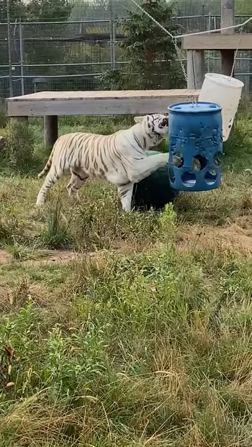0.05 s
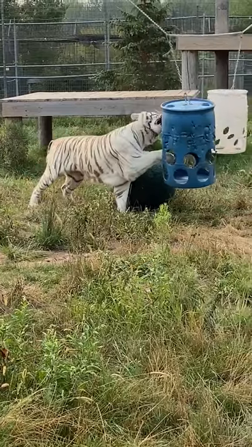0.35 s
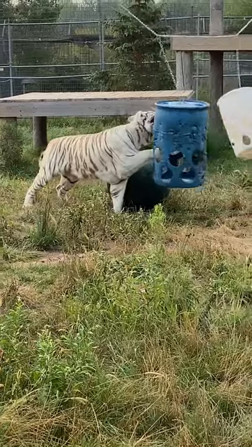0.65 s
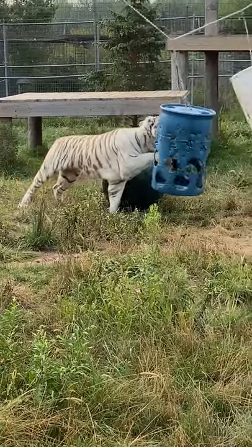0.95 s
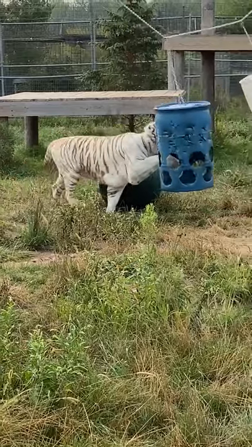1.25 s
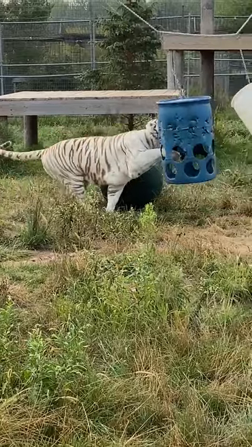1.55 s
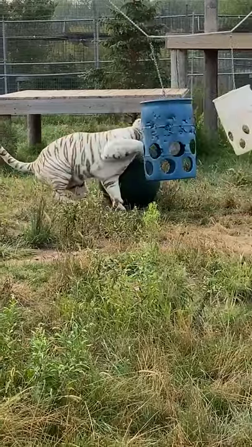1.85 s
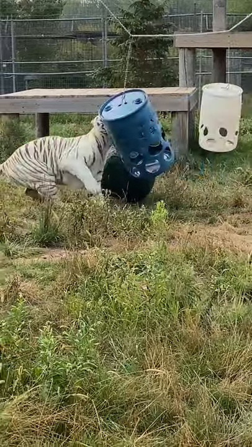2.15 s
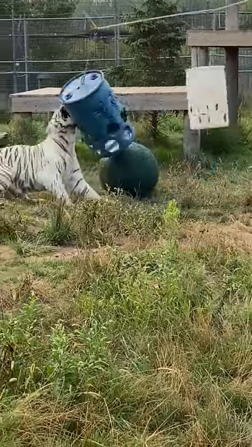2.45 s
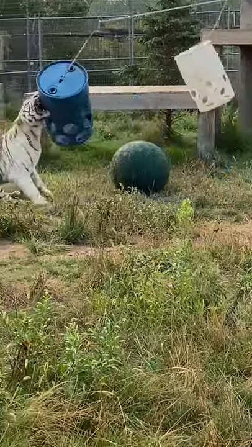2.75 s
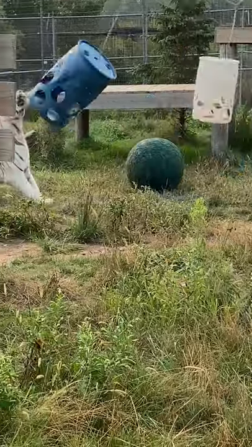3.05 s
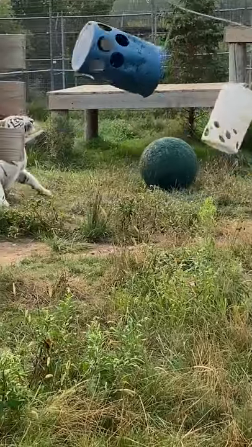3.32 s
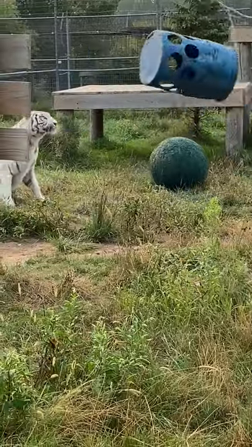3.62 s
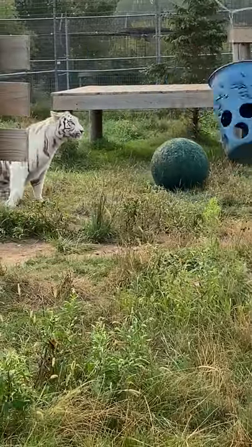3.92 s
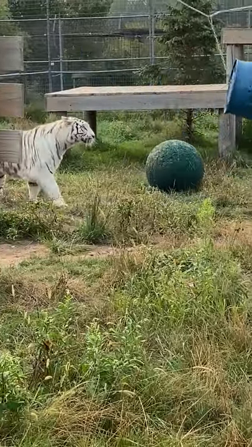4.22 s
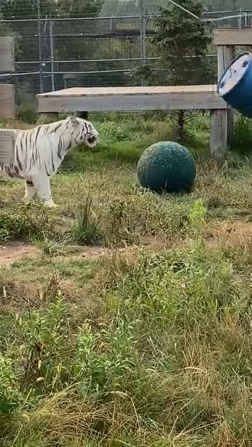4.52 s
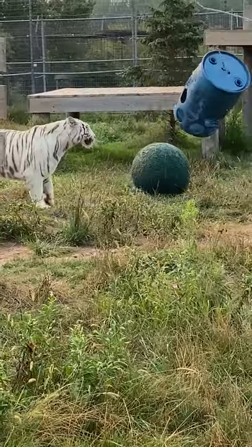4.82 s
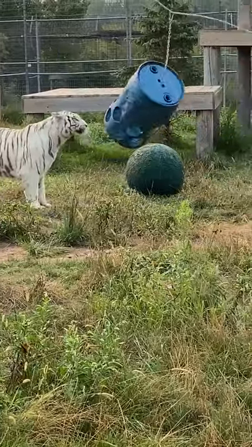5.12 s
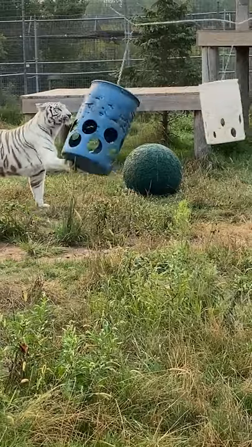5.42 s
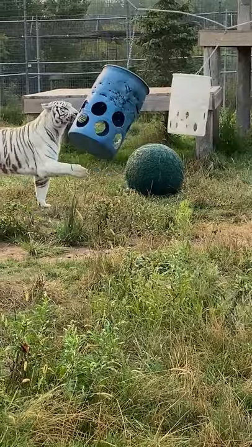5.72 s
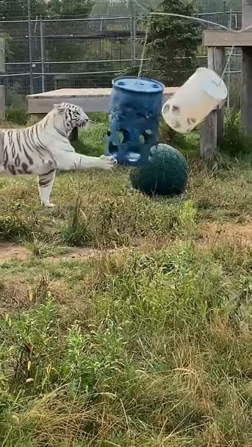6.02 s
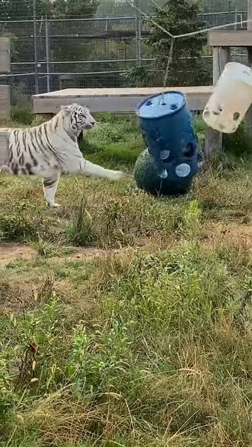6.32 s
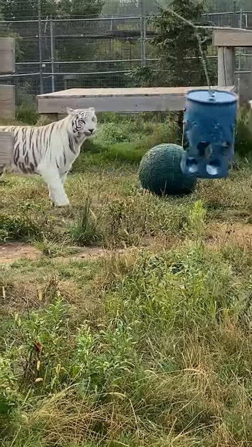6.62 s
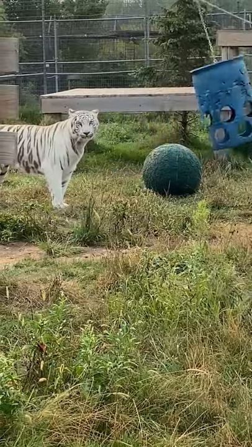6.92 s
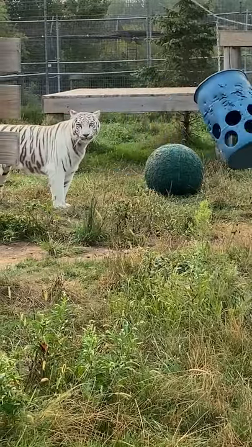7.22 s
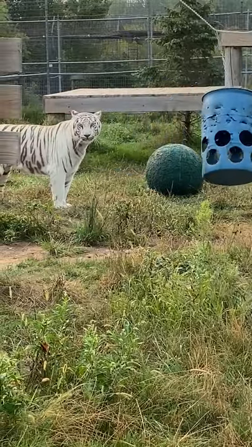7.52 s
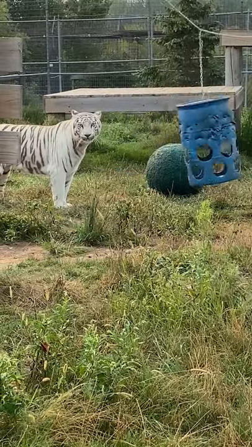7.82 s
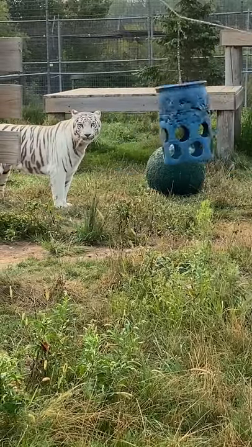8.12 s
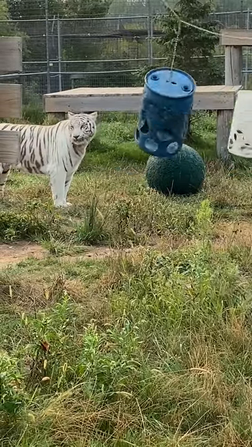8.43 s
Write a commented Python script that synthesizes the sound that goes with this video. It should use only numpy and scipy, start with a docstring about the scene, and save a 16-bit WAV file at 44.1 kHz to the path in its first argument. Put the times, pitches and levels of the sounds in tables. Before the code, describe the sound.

Hollow plastic barrels knock, boom and rattle on their chains as a tiger bats them around outdoors.

```python
"""A tiger bats a hanging plastic barrel in a grassy enclosure; a second barrel jerks on the same line.
Blows clack the plastic walls and boom the hollow drums. The chains snap taut, then rattle and
scrape by stick-slip as the load swings; a paw drags and squeaks over the wall.
Far off an engine runs unevenly, birds call and an insect ticks."""
import sys
import numpy as np
from scipy import signal
from scipy.fft import rfft, irfft
from scipy.io import wavfile
from scipy.ndimage import uniform_filter1d

SR = 44100
rng = np.random.default_rng(int(sys.argv[2]) if len(sys.argv) > 2 else 0)


def unload_audio(sound):
    """Save the sound as a 16-bit wav file, at the path given as the first command line argument."""
    columns = np.transpose(np.atleast_2d(sound))
    # keep every value between -1 and 1, then stretch to whole-number steps
    steps = np.round(np.clip(columns, -1, 1) * 32767)
    wavfile.write(sys.argv[1], SR, steps.astype(np.int16))


N = 381906

# Table levels are relative; each source applies its own gain.
# hard blows on a wall: start_s, level_db, resonance_hz, chatter_t60_s
KNOCKS = [(0.162, -22.5, 780, 0.2), (0.329, -36.5, 850, 0.065), (0.861, -37.5, 1190, 0.13),
          (1.018, -20.5, 870, 0.065), (1.585, -35, 846, 0.13), (1.667, -27.5, 740, 0.17),
          (2.131, -22, 314, 0.051), (2.271, -27.5, 334, 0.062), (2.746, -23, 690, 0.16),
          (2.889, -8, 650, 0.03), (2.899, -4, 660, 0.048), (2.939, -22.5, 1420, 0.06),
          (3.159, -19.5, 1110, 0.034), (3.268, -11, 532, 0.09), (3.435, -35, 1500, 0.039),
          (3.603, -20.5, 1360, 0.13), (3.626, -16, 1720, 0.04), (3.629, -16, 690, 0.11),
          (3.813, -26, 1150, 0.1), (3.898, -16.5, 650, 0.095), (4.121, -30.5, 1580, 0.064),
          (4.295, -24.5, 560, 0.17), (4.9, -23, 666, 0.061), (5.046, -27, 830, 0.039),
          (5.32, -19.5, 810, 0.065), (5.329, -22, 1530, 0.043), (5.337, -20.5, 576, 0.045),
          (5.486, -22, 670, 0.097), (5.827, -34, 755, 0.31), (6.369, -35.5, 2000, 0.072),
          (6.463, -31.5, 730, 0.063), (6.792, -42, 1330, 0.15), (7.079, -17, 1630, 0.025),
          (7.081, -23, 645, 0.063), (7.378, -39, 1750, 0.06), (7.454, -31.5, 706, 0.092),
          (7.861, -34, 980, 0.068)]
# heavy pushes on a drum: start_s, level_db, pitch_hz, t60_s
THUDS = [(0.171, -28.5, 179, 0.24), (0.903, -34.5, 184, 0.27), (1.096, -20, 180, 0.13),
         (1.13, -23, 180, 0.16), (2.14, -20, 102.4, 0.31), (2.6, -25.5, 178, 0.086),
         (2.752, -23.5, 225, 0.21), (2.913, -13, 106, 0.13), (2.917, -11.5, 178.5, 0.42),
         (3.289, -22, 223, 0.11), (3.641, -27.5, 113, 0.33), (3.739, -26, 98, 0.18),
         (3.804, -20.5, 166, 0.11), (3.902, -22, 156.6, 0.19), (4.309, -27, 173.3, 0.42),
         (4.559, -30, 221, 0.36), (4.72, -32.5, 207, 0.31), (5.053, -22.5, 166.4, 0.28),
         (5.331, -16.5, 160.8, 0.31), (5.491, -27.5, 165, 0.21), (6.11, -33.5, 174.7, 0.48),
         (6.468, -25.5, 180, 0.07), (7.085, -23, 168, 0.14), (7.462, -29, 155.6, 0.24),
         (7.691, -27.5, 203, 0.21), (8.09, -39.5, 176, 0.13)]
# links snapping taut: start_s, level_db, t60_s
SNAPS = [(0.156, -24.5, 0.05), (0.861, -43, 0.05), (1.4338, -38.5, 0.042), (1.6664, -30.5, 0.072),
         (2.392, -38, 0.045), (2.44, -39, 0.059), (2.549, -43, 0.46), (2.751, -28.5, 0.14),
         (2.899, -24.5, 0.067), (2.9385, -28.5, 0.058), (3.1444, -29, 0.14), (3.173, -29, 0.24),
         (3.2088, -31.5, 0.25), (3.433, -36.5, 0.042), (3.477, -36.5, 0.044), (3.6, -30.5, 0.19),
         (3.6186, -30.5, 0.31), (3.69, -25.5, 0.12), (3.815, -37, 0.052), (3.845, -35.5, 0.37),
         (3.934, -32, 0.1), (3.984, -37, 0.1), (4.068, -40.5, 0.19), (4.119, -37.5, 0.053),
         (4.2929, -17.5, 0.041), (4.557, -25.5, 0.075), (4.628, -31.5, 0.17), (4.833, -39, 0.28),
         (5.061, -30.5, 0.11), (5.125, -39.5, 0.12), (5.2786, -35, 0.22), (5.479, -36.5, 0.065),
         (5.825, -28, 0.031), (6.135, -35.5, 0.14), (6.369, -37.5, 0.023), (6.511, -42, 0.056),
         (6.888, -49, 0.057), (7.076, -29, 0.14), (7.448, -44, 0.051)]
# whole-drum modes: pitch_hz, level_db, base_t60_s
DRUM_MODES = [(74.4, 3.5, 0.11), (104, -14.5, 0.38), (118, -4, 0.25), (160.5, 4.5, 0.19), (184, 3, 0.26),
              (227.4, -6, 0.24), (263, -12.5, 0.45)]
# spectrum of sliding links: freq_hz, gain_db
RATTLE_SPECTRUM = [(200, -102), (1000, -11.5), (2200, 2.5), (3600, 6.5), (4900, 1.5), (5600, 2),
                   (6400, 5.5), (7400, 3), (11000, -1.5), (13000, 0.5), (16000, 0.5)]


def amp(db):
    """Decibels to gain."""
    return 10 ** (np.asarray(db) / 20)


def unit_rms(x):
    """Scale to rms 1."""
    return x / np.sqrt(np.mean(x ** 2) + 1e-20)


def unit_peak(x):
    """Scale the loudest 6 ms to rms 1."""
    return x / np.sqrt(uniform_filter1d(x ** 2, 256).max() + 1e-20)


def log_interp(points, hz):
    """Interpolate over log frequency."""
    points_hz, values = np.transpose(points)
    return np.interp(np.log(hz + 1), np.log(points_hz + 1), values)


def curves(rows):
    """Interpolate timed rows to one value per sample and column."""
    times_s, *columns = np.transpose(rows)
    return [np.interp(np.arange(N) / SR, times_s, column) for column in columns]


def add(mix, start_s, sound):
    """Mix a sound in at start_s."""
    part = mix[max(round(start_s * SR), 0):][:len(sound)]
    part += sound[:len(part)]


def drift(rate_hz):
    """Smooth random curve, rms 1."""
    return unit_rms(signal.resample(rng.standard_normal(max(int(2 * rate_hz * N / SR), 4)), N))


def colour(x, spectrum, size=4096):
    """Minimum-phase filter through (freq_hz, gain_db) points."""
    log_gain = np.log(amp(log_interp(spectrum, abs(np.fft.fftfreq(size, 1 / SR)))))
    taps = np.fft.ifft(np.exp(np.conj(signal.hilbert(log_gain)))).real
    return signal.fftconvolve(x, taps[:size // 2])[:len(x)]


def grains(size, per_s, spread_db):
    """Tiny random contacts, a few much harder than the rest."""
    hardness = amp(spread_db * np.minimum(rng.exponential(1, size), 4))
    return unit_rms(rng.standard_normal(size) * hardness * (rng.random(size) < per_s / SR))


def burst(t60_s, rise_s, per_s, spread_db):
    """Flurry of contacts: sharp rise, exponential decay."""
    t = np.arange(SR // 2) / SR
    envelope = (1 - np.exp(-t / rise_s)) * np.exp(-np.log(1000) * t / max(t60_s, .01))
    return grains(len(t), per_s, spread_db) * envelope


def slips(per_s, depth_db, settle_s=0.003):
    """Stick-slip envelope: a steady rub plus brief jerks where the grip lets go."""
    jerks = np.minimum(rng.exponential(1, N), 2) ** 2 * (rng.random(N) < per_s / SR)
    power = signal.lfilter([1], [1, -np.exp(-1 / (settle_s * SR))], jerks)
    return unit_rms(np.sqrt(1 + amp(depth_db) ** 2 * power / power.mean()))


def swells(rows):
    """Contact pressure: one smooth rise and fall per row."""
    pressure = np.zeros(N)
    for centre_s, level_db, length_s in rows:
        add(pressure, centre_s - length_s / 2, amp(level_db) * np.hanning(max(int(length_s * SR), 8)))
    return pressure


def ring(modes, damping=1, size=SR // 2):
    """Unit-energy impulse response; adjacent modes swing in opposite directions."""
    t = np.arange(size) / SR
    response = sum((-1) ** k * amp(db - 60 * t * damping / t60_s) * np.sin(2 * np.pi * hz * t)
                   for k, (hz, db, t60_s) in enumerate(modes))
    return response / np.linalg.norm(response)


def air(level_db=-53.5):
    """Soft open air, slowly wavering."""
    # freq_hz, gain_db
    spectrum = [(25, -22), (60, 10.5), (110, -18.5), (200, 1), (320, -20.5), (600, -15), (1200, -25),
                (3300, -27), (6500, -38.5), (10000, -52), (16000, -88)]
    return amp(level_db + 2 * drift(2.8)) * unit_rms(colour(rng.standard_normal(N), spectrum))


def insect(level_db=-70, pitch_hz=6500, ticks_per_s=10):
    """Narrow-band buzz in uneven pulses."""
    band = [(pitch_hz - 900, -50), (pitch_hz - 200, 0), (pitch_hz + 200, 0), (pitch_hz + 900, -50)]
    buzz = colour(rng.standard_normal(N), band)
    ticks = np.sin(np.pi * np.cumsum(ticks_per_s + drift(2)) / SR) ** 4
    return amp(level_db) * unit_rms(buzz * ticks)


def engine(waver_db=3):
    """Distant engine: only the lowest firing orders carry this far."""
    # time_s, firing_hz, level_db
    running = [(0.25, 26, -52), (.4, 28.8, -44), (.55, 31.2, -45), (.95, 25, -45.5), (1.2, 30.3, -46.5),
               (2.1, 33, -47), (3, 31.5, -52), (5.4, 32.2, -53), (6.1, 30.7, -46.5), (7.1, 28.9, -48),
               (8, 28.6, -48), (8.6, 24.5, -50.5)]
    # firing_multiple, level_db
    orders = [(1, -35), (2, -12.5), (3, -0.5), (4, -5.5), (5, -12)]
    firing_hz, level_db = curves(running)
    cycles = np.cumsum(firing_hz * (1 + 0.0055 * drift(7))) / SR
    hum = sum(amp(db + waver_db * drift(5.9)) * np.sin(2 * np.pi * (k * cycles + rng.random()))
              for k, db in orders)
    return amp(level_db) * unit_rms(hum)


def far_bird(waver=0.00345, fade_s=0.01):
    """One thin call that climbs, holds and falls away."""
    # time_s, pitch_hz, level_db
    call = [(1.3, 900, -59), (1.34, 947, -76), (1.378, 1000, -58), (1.41, 974, -87), (1.564, 1030, -82),
            (1.59, 1062, -60), (1.85, 1098, -68), (1.925, 1042, -53), (1.95, 1000, -71)]
    # pitch_multiple, level_db
    harmonics = [(1, -3), (2, -6), (3, -0.5)]
    pitch_hz, level_db = curves(call)
    t = np.arange(N) / SR
    fade = np.clip(np.minimum(t - call[0][0], call[-1][0] - t) / fade_s, 0, 1)
    cycles = np.cumsum(pitch_hz * (1 + waver * drift(80))) / SR
    tone = sum(amp(db) * np.sin(2 * np.pi * k * cycles) for k, db in harmonics)
    return fade * amp(level_db) * unit_rms(tone)


def small_bird(gain_db=-3, chip_s=0.047):
    """High chips, each one quick, unsteady glide."""
    # start_s, start_hz, end_hz, level_db
    chips = [(1.925, 4110, 3830, -54), (5.022, 4400, 5300, -41)]
    out, arch = np.zeros(N), np.hanning(int(chip_s * SR))
    for start_s, start_hz, end_hz, level_db in chips:
        pitch_hz = np.linspace(start_hz, end_hz, len(arch)) * (1 + .02 * drift(300)[:len(arch)])
        add(out, start_s, amp(level_db + gain_db) * arch * np.sin(2 * np.pi * np.cumsum(pitch_hz) / SR))
    return out


def enclosure(x, early_db=-9, tail_db=-15, tail_t60_s=0.38, path_sets=4):
    """Ground, platform and fences return echoes and a short tail; paths change as the barrels swing."""
    t, out = np.arange(SR // 2) / SR, x
    for k in range(path_sets):
        early = grains(len(t), per_s=1500, spread_db=0.48) * (t > .004) * np.exp(-t / 0.025)
        tail = colour(rng.standard_normal(len(t)), [(100, 6.5), (1500, -14.5), (5000, -31), (16000, -2)])
        tail = tail * (1 - np.exp(-t / 0.01)) * np.exp(-np.log(1000) * t / tail_t60_s)
        echoes = amp(early_db) * early / np.linalg.norm(early)
        echoes += amp(tail_db) * tail / np.linalg.norm(tail)
        crossfade = np.maximum(np.cos(2 * np.pi * (np.arange(N) / SR + k / path_sets)), 0)
        out = out + signal.fftconvolve(x * crossfade, echoes)[:N]
    return out


def wall(force, ring_db, stretch=1, t60_at_650hz_s=0.11):
    """Plastic wall: a broad dull response plus damped modes, shifted by stretch as it bends."""
    # pitch_hz, level_db
    wall_modes = [(384, 12.5), (445, 7), (530, 2.5), (646, 19), (717, 10), (805, -0.5), (870, 13),
                  (1065, 20.5), (1190, 14.5), (1275, 21.5), (1390, -0.5), (1643, 12), (2111, 9.5)]
    # freq_hz, gain_db
    spectrum = [(60, -50), (200, -11.5), (330, -5.5), (450, 2), (700, 1), (1000, 1.5), (1500, -4.5),
                (2200, -8), (4000, -19), (7000, -23), (16000, -72)]
    modes = [(hz * stretch, db, t60_at_650hz_s * np.sqrt(650 / hz)) for hz, db in wall_modes]
    ringing = signal.fftconvolve(force, ring(modes, size=SR // 5))[:len(force)]
    return unit_rms(colour(force, spectrum)) + amp(ring_db) * unit_rms(ringing)


def turning(x, depth_db=3.2):
    """Links and barrel turn, moving the contact: single resonances flare and fade."""
    frames = signal.stft(x, nperseg=512, noverlap=384)[2]

    def patches(bins, hops):
        across_freq = uniform_filter1d(rng.standard_normal(frames.shape), bins, axis=0)
        return unit_rms(uniform_filter1d(across_freq, hops, axis=1))

    flare = np.clip(patches(5, 12) + .5 * patches(40, 20), -2, 2)
    return signal.istft(frames * unit_rms(amp(depth_db * flare)), nperseg=512, noverlap=384)[1][:N]


def agitation(blows, swing_db, follow, shake_db, settle_db_per_s):
    """Rubbing strength of a part: follows the swing and flares after its own blows."""
    # load swinging on its line: time_s, effort_db
    swing = [(0, -14), (0.7, -22), (1.1, -5), (1.9, -6.5), (2.65, 0.5), (3.25, 11), (3.55, -4), (3.75, 13),
             (4.05, 7.5), (4.2, -6.5), (4.6, 0), (5.45, 3), (5.73, -7.5), (5.9, -0.5), (6.9, -8),
             (7.75, -4), (8.27, -13), (8.65, -2)]
    effort_db, = curves(swing)
    shake_power, t = np.zeros(N), np.arange(SR) / SR
    for start_s, level_db, *_ in blows:
        add(shake_power, start_s, amp(level_db - settle_db_per_s * t) ** 2)
    return np.hypot(amp(swing_db + follow * effort_db), amp(shake_db) * np.sqrt(shake_power))


def rubbing(clump_db=0.77):
    """Stick-slip of the swinging load: shared clumps of grains shake drum, wall and chain."""
    drum_gain = agitation(THUDS, swing_db=-47.5, follow=0.8, shake_db=-20.5, settle_db_per_s=80)
    wall_gain = agitation(KNOCKS, swing_db=-52, follow=0.97, shake_db=-22.5, settle_db_per_s=124)
    chain_gain = agitation(SNAPS, swing_db=-56.5, follow=0.82, shake_db=-33.5, settle_db_per_s=79)
    clumps = amp(clump_db * drift(30))
    jerks = clumps * slips(per_s=96, depth_db=-4)
    fine = grains(N, per_s=5000, spread_db=1)
    crackle = grains(N, per_s=5000, spread_db=1.8)
    shudder = unit_rms(signal.fftconvolve(fine * clumps, ring(DRUM_MODES, damping=1.7))[:N])
    scrape = unit_rms(wall(fine * jerks, ring_db=-18))
    rattle = unit_rms(colour(crackle * jerks, RATTLE_SPECTRUM))
    return drum_gain * shudder + wall_gain * scrape + chain_gain * rattle


def scuffs(gain_db=3, wall_db=-5):
    """Sliding links and dry grass crunch in jerky swells; the barrel sounds along."""
    # centre_s, level_db, length_s
    slides = [(0.42, -56.5, 0.028), (1.85, -55, 0.14), (2.427, -42, 0.11), (2.868, -41.5, 0.29),
              (3.34, -40.5, 0.079), (4.365, -42, 0.17), (4.572, -37.5, 0.11), (4.675, -49.5, 0.083),
              (5.068, -42, 0.075), (5.185, -49, 0.11), (5.495, -41, 0.076), (5.835, -43, 0.084),
              (5.925, -47, 0.18), (6.089, -49, 0.07), (6.18, -52.5, 0.18), (6.542, -51.5, 0.24),
              (6.687, -50, 0.14), (7.012, -51, 0.17), (7.14, -50, 0.059), (7.322, -51.5, 0.2),
              (7.465, -41.5, 0.059), (7.738, -49, 0.11), (7.992, -49.5, 0.11), (8.094, -48, 0.12),
              (8.425, -51, 0.2), (8.506, -49, 0.078)]
    force = swells(slides) * grains(N, per_s=6000, spread_db=1.7) * slips(per_s=80, depth_db=0.5)
    crunch = unit_rms(colour(force, RATTLE_SPECTRUM))
    body = unit_rms(wall(force, ring_db=-17))
    return amp(gain_db) * np.std(force) * (crunch + amp(wall_db) * body)


def chain_snaps(gain_db=-3, softness=0.0088):
    """Links jerk tight in a bright clatter; longer ones start more softly."""
    # freq_hz, gain_db
    link_spectrum = [(200, -17.5), (900, 7.5), (2000, 5), (3600, 4.5), (4900, 0), (5600, -1.5), (6400, 6),
                     (7400, -5), (11000, -2), (13000, -5), (16000, -10.5)]
    out = np.zeros(N)
    for start_s, level_db, t60_s in SNAPS:
        force = burst(t60_s, rise_s=softness * t60_s, per_s=8000, spread_db=2.5)
        add(out, start_s, amp(level_db + gain_db) * unit_peak(colour(force, link_spectrum)))
    return out


def squeaks(waver=0.0133):
    """The rubbed wall catches: one mode sings briefly at an unsteady pitch."""
    # centre_s, level_db, length_s, pitch_hz
    catches = [(0.896, -44, 0.029, 1280), (4.865, -50, 0.08, 1250), (5.185, -51, 0.12, 1293),
               (7.021, -41, 0.065, 436), (7.022, -44, 0.055, 802), (7.03, -39.5, 0.08, 650),
               (7.272, -42.5, 0.028, 654)]
    out = np.zeros(N)
    for centre_s, level_db, length_s, pitch_hz in catches:
        cycles = np.cumsum(pitch_hz * (1 + waver * drift(120))) / SR
        out += swells([(centre_s, level_db, length_s)]) * np.sin(2 * np.pi * cycles)
    return out


def paw_drags():
    """Paw, claws and rope judder over the wall: a dull, hollow rustle."""
    # centre_s, level_db, length_s
    strokes = [(0.87, -51, 0.2), (1.09, -56, 0.083), (2.44, -48, 0.15), (2.887, -29, 0.065),
               (3.06, -56, 0.085), (3.175, -32.5, 0.054), (3.23, -31, 0.07), (3.63, -26, 0.09),
               (3.98, -42.5, 0.13), (4.45, -48, 0.16), (4.67, -47.5, 0.084), (5.09, -40, 0.07),
               (6.57, -53, 0.26), (7.73, -45.5, 0.2), (8.0, -50.5, 0.11)]
    force = swells(strokes) * grains(N, per_s=3000, spread_db=0.67) * slips(per_s=170, depth_db=5)
    return np.std(force) * unit_rms(wall(force, ring_db=0.5))


def boom(pitch_hz, t60_s, drum_db=-7, rise_s=0.0031, flutter_db=-9):
    """A pushed-in panel booms; the drum modes join in, and the buckling wall flutters."""
    t = np.arange(SR // 2) / SR
    panel = unit_peak(ring([(pitch_hz, 0, t60_s)]))
    drum = unit_peak(ring(DRUM_MODES, damping=0.92))
    hollow = unit_peak((panel + amp(drum_db) * drum) * (1 - np.exp(-t / rise_s)))
    buckling = burst(t60_s=0.11, rise_s=0.0092, per_s=3300, spread_db=1)
    spectrum = [(30, -22), (70, -28), (130, 11), (240, 1.5), (340, -14.5), (700, -6), (2000, -75)]
    return unit_peak(hollow + amp(flutter_db) * unit_peak(colour(buckling, spectrum)))


def thuds(gain_db=-5, knock_share_db=-17, knock_lag_s=0.00588):
    """Heavy pushes boom the drum; each wall knock passes it a little force too."""
    out = np.zeros(N)
    for start_s, level_db, pitch_hz, t60_s in THUDS:
        add(out, start_s, amp(level_db + gain_db) * boom(pitch_hz, t60_s))
    for start_s, level_db, *_ in KNOCKS:
        add(out, start_s + knock_lag_s, amp(level_db + knock_share_db) * boom(pitch_hz=190, t60_s=0.13))
    return out


def slam(start_s=2.897, level_db=-7, pitch_hz=190):
    """The hardest blow shoves the whole wall in: one deep pressure pulse."""
    out, t = np.zeros(N), np.arange(SR // 70) / SR
    add(out, start_s, amp(level_db) * np.hanning(len(t)) * np.sin(2 * np.pi * pitch_hz * t))
    return out


def knocks(gain_db=-8, strike_db=17, glance_db_per_s=65, softness=0.011, reach=2.36):
    """Each blow strikes, then chatters on the wall; glancing ones strike less and chatter longer."""
    out = np.zeros(N)
    for start_s, level_db, resonance_hz, t60_s in KNOCKS:
        chatter = burst(t60_s, rise_s=softness * t60_s, per_s=5500, spread_db=2.5)
        strike = amp(strike_db - glance_db_per_s * t60_s) * signal.unit_impulse(len(chatter), SR // 1000)
        padding = signal.butter(2, min(reach * resonance_hz, SR / 3), fs=SR)  # soft contact cuts treble
        force = signal.lfilter(*padding, chatter + strike)
        clack = wall(force, ring_db=-6.5, stretch=1 + .007 * rng.standard_normal())
        resonance = signal.iirpeak(resonance_hz, Q=2.4, fs=SR)  # set by where the blow lands
        spot = signal.lfilter(*resonance, signal.lfilter(*resonance, clack))
        wall_share = min(resonance_hz / 600, 1) ** 3  # low blows barely rattle the rest of the wall
        knock = unit_peak(wall_share * unit_rms(clack) + unit_rms(spot))
        add(out, start_s, amp(level_db + gain_db) * knock)
    return out


def stereo_ports(x):
    """Two close ports hear the same bass; the treble differs in phase and diffuse scatter."""
    # freq_hz, left_lead_rad
    port_phase = [(0, 0), (2050, 0), (2480, .4), (2850, .02), (3850, .02), (4400, .6), (4750, .03),
                  (5400, .03), (5900, 1.5), (6350, 2.2), (6700, 3.12), (7850, 3.14), (7960, 0),
                  (13000, .03), (13700, 1.3), (14300, 3.05), (16000, 3.1)]
    # freq_hz, left_right_likeness
    port_likeness = [(0, 1), (110, 1), (200, .999), (330, .992), (650, .997), (1200, .975), (1900, .997),
                     (2480, .88), (2900, .997), (3750, .997), (4450, .72), (4750, .99), (5300, .99),
                     (5800, .6), (6900, .998), (11500, .995), (12050, .8), (12400, .99), (13000, .98),
                     (13400, .55), (16000, .6)]
    # freq_hz, left_minus_right_db
    port_balance = [(250, 0), (400, -.4), (950, 1.2), (1300, .9), (2000, 0)]
    hz, spectrum = np.fft.rfftfreq(N, 1 / SR), rfft(x)
    likeness = np.clip(log_interp(port_likeness, hz), 0, 1)
    frames = signal.stft(irfft(np.sqrt(1 - likeness) * spectrum, N), nperseg=256)[2]
    scatter = signal.istft(frames * np.exp(2j * np.pi * rng.random(frames.shape)))[1][:N]
    mid = np.sqrt((1 + likeness) / 2) * spectrum
    side = rfft(scatter) * np.minimum(hz / 220, 1) ** 3
    lean = amp(log_interp(port_balance, hz) / 2)
    left = (mid + side) * np.exp(1j * log_interp(port_phase, hz)) * lean
    right = (mid - side) / lean
    return irfft(np.array([left, right]), N)


def scene():
    """Barrels in their enclosure over the quiet background."""
    contacts = knocks() + paw_drags() + squeaks() + turning(chain_snaps() + scuffs() + rubbing())
    barrels = enclosure(contacts) + thuds() + slam()
    # a drum full of holes radiates little deep bass
    barrels = signal.sosfilt(signal.butter(2, 55, "highpass", fs=SR, output="sos"), barrels)
    return stereo_ports(barrels + engine() + far_bird() + small_bird() + air() + insect())


def record(dry):
    """Steep treble limit."""
    cutoff_hz = 15820
    taps = signal.firwin(511, cutoff_hz, window=("kaiser", 9), fs=SR)
    return signal.oaconvolve(dry, taps[None], "same")


dry = scene()
out = record(dry)
unload_audio(out)
```